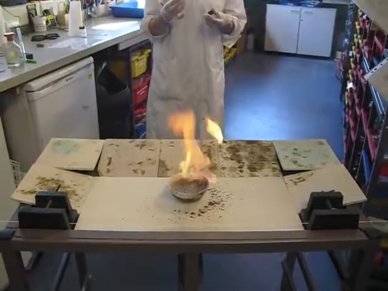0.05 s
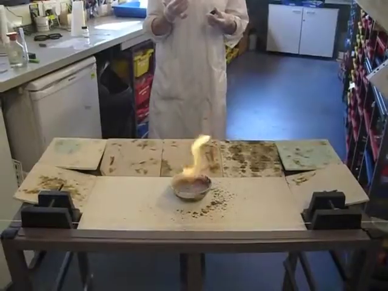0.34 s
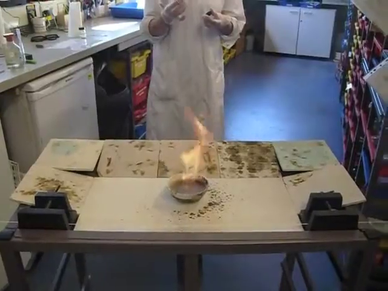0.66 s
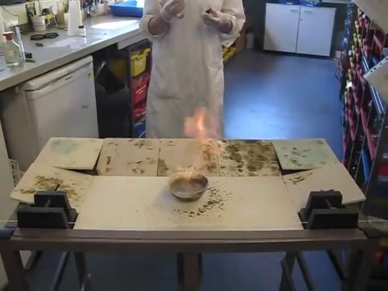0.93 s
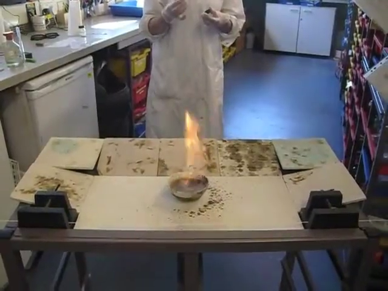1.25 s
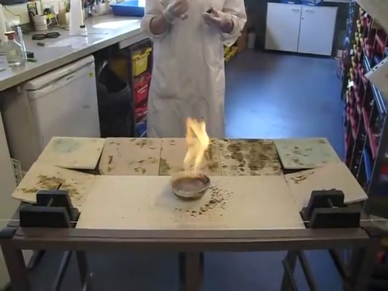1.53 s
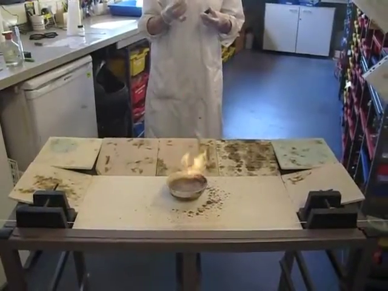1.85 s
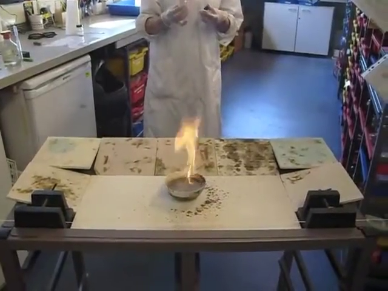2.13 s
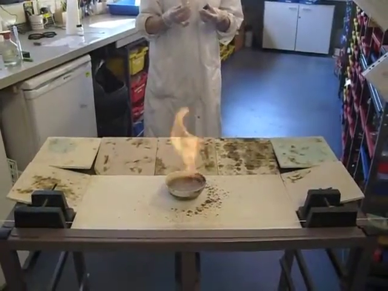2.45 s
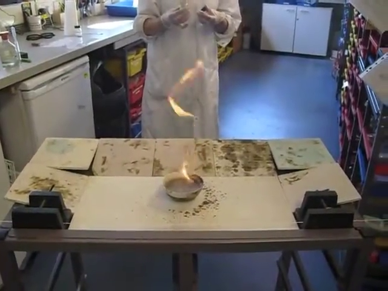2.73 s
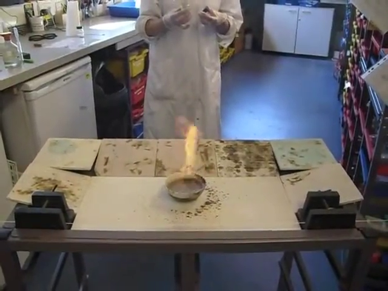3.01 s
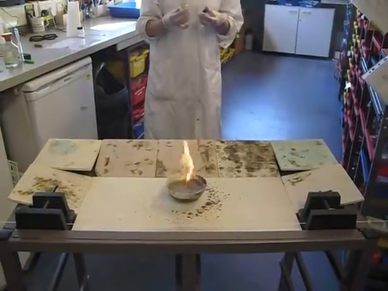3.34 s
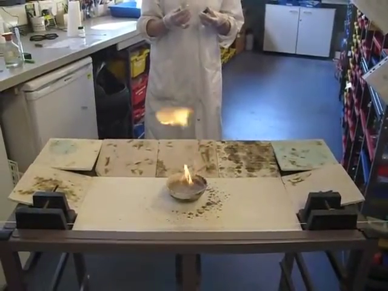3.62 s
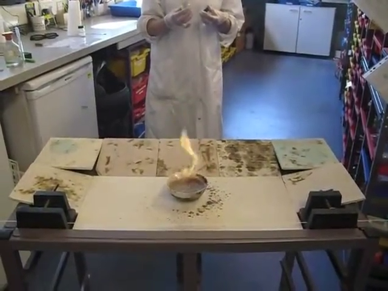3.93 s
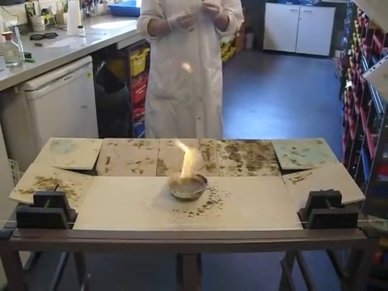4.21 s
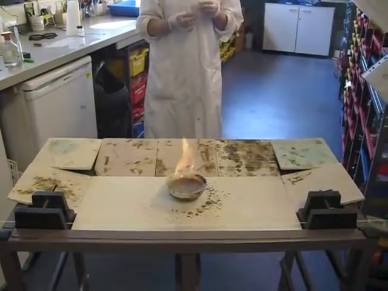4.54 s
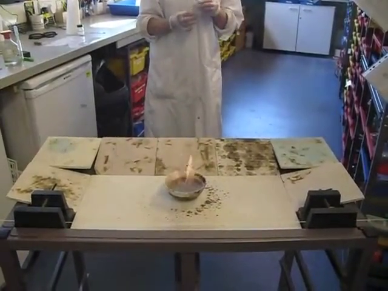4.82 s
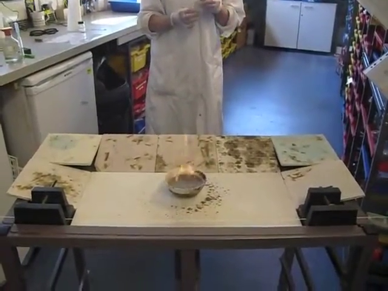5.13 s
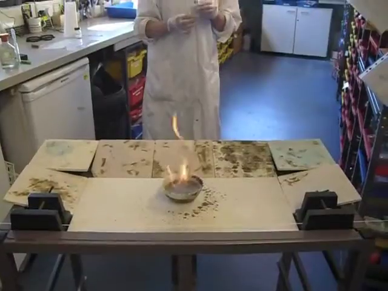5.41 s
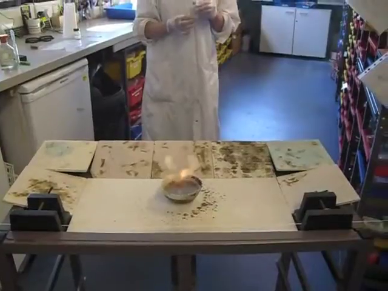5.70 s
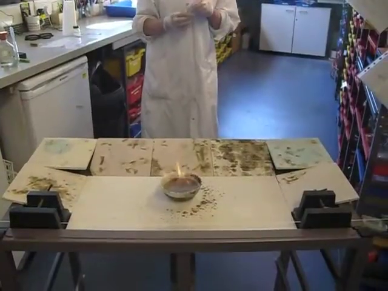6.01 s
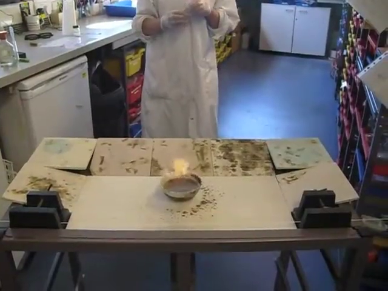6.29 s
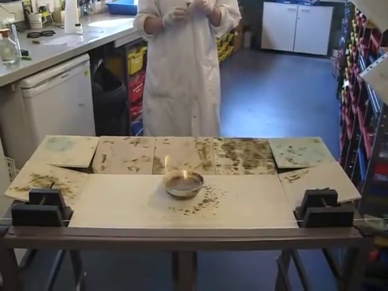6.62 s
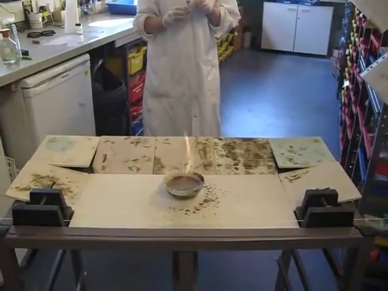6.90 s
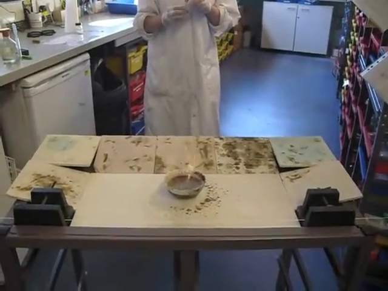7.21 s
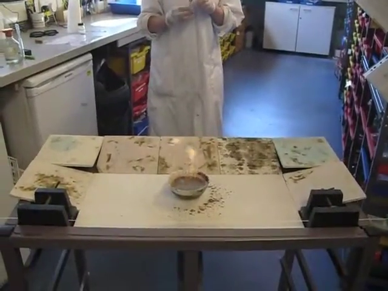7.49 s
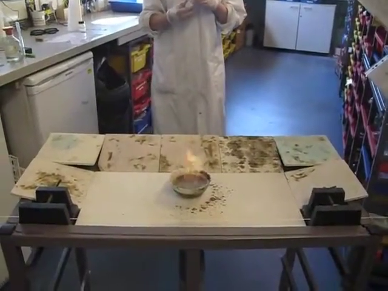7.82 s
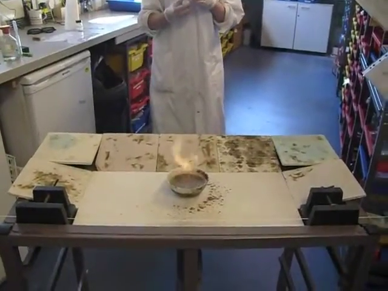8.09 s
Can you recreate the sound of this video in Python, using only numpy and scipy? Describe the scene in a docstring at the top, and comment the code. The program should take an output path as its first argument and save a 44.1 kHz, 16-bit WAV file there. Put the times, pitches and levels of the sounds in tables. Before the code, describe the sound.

A mixture burning in a small dish on a lab bench goes off in about ten sharp, uneven pops during the first three seconds, each with a brief spitting tail. It then settles into quiet sputtering and crackling, with one small late pop, short sizzles and a few tiny squeaks. The sound is centred, with a short room echo, over low ventilation rumble and faint microphone hiss.

```python
"""Burning mixture in a lab dish

For three seconds pockets of gas go off in sharp pops; after that the melt sputters, crackles and squeaks,
with one small late pop. Every burst is a pressure pulse, doubled by the bench top and answered by the
room. Ventilation rumbles underneath, and the camera adds hiss and a thin whine."""
import sys
import numpy as np
from scipy import signal
from scipy.fft import rfft, irfft, next_fast_len
from scipy.io import wavfile
from scipy.ndimage import uniform_filter1d, map_coordinates

SR = 44100
rng = np.random.default_rng(int(sys.argv[2]) if len(sys.argv) > 2 else 0)


def master(y):
    """Save y as 16-bit WAV."""
    cut = np.clip(np.atleast_2d(y).T, -1, 1)
    pcm = np.round(cut * 32767)  # scale
    wavfile.write(sys.argv[1], SR, pcm.astype(np.int16))


N = 359415

# Levels in the tables are relative; each layer sets its own gain.
# bed of ventilation and hiss: f/Hz, level/dB
AIR_COLOUR = [(13, -50), (22, 0.5), (150, -8), (250, -13.5), (430, -15.5), (600, -21.5), (1000, -22),
              (1500, -28), (2200, -32.5), (3100, -35), (4400, -36.5), (15000, -41)]
# low rumble of the duct: f/Hz, level/dB
DUCT_COLOUR = [(15, -2.0), (30, -6.5), (45, 5.0), (60, 7.5), (80, -1.5), (130, -20), (400, -54)]
# how hard the melt simmers, sinking until 3 s and swelling again by 5 s: t/s, level/dB
SIMMER_LEVEL = [(0, -57), (0.55, -58), (0.9, -61), (3.0, -67.5), (4.5, -59), (5.15, -51), (6.2, -51),
                (7.0, -56), (8.15, -55.5)]
# gas pockets going off: t/s, level/dB, thump/dB, upper body/dB, bite/dB, spray/dB, spray top/dB,
# cavity f/Hz; thump, upper body and bite count against their column's median
GAS_POCKETS = [(0.059, -4, -14.5, -32.5, -20.5, -26.5, 2.5, 3280),
               (0.602, -9, -16.5, -18.5, -21.5, -22, -5.5, 3070),
               (0.8738, 0.5, -14, -31, -30, -29.5, 0, 3230), (1.254, -2, -15, -23.5, -27, -30.5, 0.5, 2360),
               (1.512, -22, -15.5, -23.5, -11.5, -28, 3, 2480),
               (1.648, -4.5, -16, -24, -26.5, -30.5, -2, 2520),
               (1.963, -20.5, -1.5, -12, -4.5, -18, 3.5, 2520),
               (2.355, -10.5, -20, -26.5, -18, -24.5, -4.5, 2510),
               (2.629, -11, -11.5, -23.5, -18, -20, -3.5, 2620),
               (2.964, -6.5, -12.5, -32.5, -17, -21, -4.5, 2630),
               (5.831, -22.5, -21, -22, -17, -26.5, -6, 2550)]
# pressure pulse of a pop: f/Hz, level/dB
BLAST_COLOUR = [(40, -6.5), (110, -12), (200, 5.5), (380, 5.5), (700, 6), (1050, 6.5), (1400, -3.5),
                (2100, -11), (2900, -8), (4000, -32), (8000, -30.5), (15000, -52)]
# spray from a tearing film: f/Hz, level/dB
SNAP_COLOUR = [(800, -1), (2000, -4), (2900, 4), (4100, 1), (5600, 4.5), (8000, -3.5), (12000, -8.5),
               (15000, -13)]
# larger bubbles bursting in the melt: t/s, level/dB, brightness/dB
BUBBLES = [(0.297, -35.5, -29), (0.416, -28, -13), (0.441, -31, -27), (0.456, -26.5, -24),
           (0.512, -28.5, -16), (0.568, -32.5, -8.5), (1.164, -30.5, -21), (1.497, -30, -12),
           (1.911, -35.5, -17), (2.192, -32.5, -14), (2.32, -27.5, -17.5), (2.45, -30, -25),
           (3.301, -32, -13), (3.367, -29, -27), (3.381, -35, -29), (3.408, -35, -38), (3.588, -39, -17),
           (3.606, -29.5, -23), (3.663, -34, -21), (3.753, -34, -44), (3.822, -35.5, -28),
           (4.029, -34.5, -20), (4.11, -28, -25.5), (4.31, -32.5, -37), (4.35, -36.5, -9),
           (4.582, -38.5, -24), (4.739, -36.5, -24), (4.824, -37.5, -13), (4.897, -33.5, -12.5),
           (4.992, -36, -24), (5.045, -35.5, -11), (5.105, -32.5, -11), (5.225, -32, -17),
           (5.296, -31.5, -13), (5.318, -36, -17), (5.45, -38.5, -18), (5.518, -30.5, -24),
           (5.645, -33.5, -22), (5.666, -32, -11), (5.756, -38, -18), (5.982, -36, -20), (6.01, -29.5, -18),
           (6.086, -30, -23), (6.221, -32.5, -12), (6.325, -32.5, -20), (6.493, -37, -13),
           (6.531, -36, -33), (6.662, -35, -12), (6.735, -30.5, -19), (6.818, -36, -15), (6.942, -38, -33),
           (7.172, -29.5, -17), (7.502, -34.5, -11), (7.651, -35, -16), (7.675, -39.5, -23),
           (7.838, -33.5, -30), (7.98, -38.5, -12), (8.01, -37, -11)]
# pressure pulse of a bubble: f/Hz, level/dB
BUBBLE_COLOUR = [(60, -34.5), (200, 3.5), (400, 3.5), (750, 6), (1100, 5.5), (1500, -5), (2100, -10.5),
                 (2800, -9.5), (3900, -23), (6000, -28.5), (9000, -45), (15000, -44)]
# strongest jets of gas leaving the melt: t/s, level/dB
JETS = [(.416, -66), (.575, -55), (5.835, -48.5), (6.06, -53), (7.122, -53.5), (7.465, -57)]
# sizzle of a jet: f/Hz, level/dB
JET_COLOUR = [(1000, -7), (2800, -5), (4300, -2.5), (6300, -5.5), (9000, -14.5), (15000, -13)]
# gas squeaking through the crust: t/s, f/Hz, level/dB
PINHOLES = [(0.415, 3260, -55), (1.515, 3280, -48.5), (6.591, 804, -55), (6.763, 3200, -63),
            (7.12, 755, -50.5), (7.12, 3110, -66), (7.315, 3250, -66)]
# ring of bench and dish: f/Hz, width/Hz, level/dB
BENCH_MODES = [(270, 160, -0.5), (342, 7.6, 0.5), (442, 28, -4.5), (720.2, 28, 11), (740, 28, -5),
               (980, 6.7, -21), (994, 62, 2), (1030, 6.5, 2), (1360, 8.8, -9.5), (2516, 86, 12.5),
               (3268, 71, 8.5)]
# early reflections off boards, coat and cupboards: delay/ms, gain
REFLECTIONS = [(3.5, 0.1), (6.7, 0.056), (9.3, 0.3), (12.0, 0.043), (15.8, 0.24), (22.0, 0.079)]
# decay of the room's tail: f/Hz, t60/s
TAIL_T60 = [(150, 0.45), (400, 0.29), (1000, 0.23), (3000, 0.26), (6000, 0.29), (14000, 0.24)]
# tone of the room's tail: f/Hz, level/dB
TAIL_COLOUR = [(100, -14.5), (280, -3), (380, 4), (590, -6), (700, 0.5), (1000, 0), (1500, 5.5),
               (2100, 4.5), (3000, 5), (5000, 1.5), (14000, 5)]
# side signal, the diffuse sound that differs between two close microphone capsules: f/Hz, level/dB
SIDE_COLOUR = [(60, -39), (500, -46.5), (1000, -43.5), (2000, -33.5), (4000, -32), (14000, -25)]


def amp(db):
    """Decibels to gain."""
    return 10 ** (np.asarray(db) / 20)


def unit(x):
    """Scale to rms 1."""
    return x / np.sqrt(np.mean(x ** 2) + 1e-20)


def along(points, hz):
    """Read (f/Hz, value) points on a log frequency axis."""
    f, values = np.transpose(points)
    return np.interp(np.log(hz + 1), np.log(f + 1), values)


def wobble(rate):
    """A smooth random curve, rate knots a second."""
    return map_coordinates(rng.standard_normal(int(N * rate / SR) + 4), [np.arange(N) * rate / SR])


def filtered(x, response):
    """Pass x through a complex frequency response."""
    size = next_fast_len(N + SR)
    return irfft(rfft(x, size) * response(np.fft.rfftfreq(size, 1 / SR)), size)[..., :N]


def noise(colour):
    """Coloured noise of rms 1."""
    return unit(filtered(rng.standard_normal(N), lambda hz: amp(along(colour, hz))))


def pulse(colour, tilt=((1, 0),), size=2048):
    """A minimum-phase pressure pulse of the given colour, of peak 1 before the tilt EQ."""
    hz = np.fft.rfftfreq(size, 1 / SR)
    fold = np.r_[1, np.full(size // 2 - 1, 2), 1, np.zeros(size // 2 - 1)]
    causal = lambda db: irfft(np.exp(rfft(irfft(np.log(amp(db))) * fold)))
    plain_db = along(colour, hz)
    return causal(plain_db + along(tilt, hz)) / np.abs(causal(plain_db)).max()


def strikes(times, gains):
    """Impulses of the given sizes at the given times."""
    return np.bincount(np.round(np.clip(times, 0, None) * SR).astype(int), gains, N)[:N]


def envelope(triggers, rise_s, t60):
    """Every trigger starts a quick attack and an exponential decay."""
    t = np.arange(SR // 2) / SR
    shape = (1 - np.exp(-t / rise_s)) * amp(-60 * t / t60)
    return signal.fftconvolve(triggers, shape)[:N]


def room_tone(air_db=-50.5, rumble_db=-55, swell_db=1.0, whine_db=-69, whine_hz=15734):
    """Ventilation noise with a gently swelling rumble, plus the camera's hiss and whine."""
    air = amp(air_db) * noise(AIR_COLOUR)
    rumble = noise(DUCT_COLOUR) * amp(rumble_db + swell_db * wobble(rate=1.65))
    whine = amp(whine_db) * np.sqrt(2) * np.sin(2 * np.pi * whine_hz * np.arange(N) / SR)
    return air + rumble + whine


def simmer(gain_db=-8, spread_db=5, bubbles_per_colour=170, flurry_db=-24.5):
    """Tiny bubbles, dull to bright, burst at random; each larger bubble shakes loose a flurry of them."""
    patter = np.zeros(N)
    for bright_db in (-6, 0, 5):
        times = rng.random(bubbles_per_colour) * N / SR
        sizes = amp(spread_db * np.clip(rng.standard_normal(bubbles_per_colour), -2, 2))
        burst = pulse(BUBBLE_COLOUR, tilt=[(300, -bright_db), (1000, 0.014), (2400, bright_db)])
        patter += signal.fftconvolve(strikes(times, sizes), burst)[:N]
    bubble_s, bubble_db, _ = np.transpose(BUBBLES)
    flurries = envelope(strikes(bubble_s, amp(bubble_db + flurry_db)), rise_s=0.02, t60=0.29)
    bed_db = np.interp(np.arange(N) / SR, *np.transpose(SIMMER_LEVEL))
    return np.hypot(amp(bed_db + gain_db), flurries) * unit(patter)


def pops(spray_gain_db=7, snap_t60=0.011, spit_db=-25, spit_t60=0.18, cavity_width_hz=450):
    """A gas pocket goes off; its film tears in a snap of spray that rings the emptied cavity."""
    out = np.zeros(N + SR)
    t = np.arange(SR // 8) / SR
    snap_and_spit = amp(-60 * t / snap_t60) + amp(spit_db - 60 * t / spit_t60)
    usual_colour = np.median(GAS_POCKETS, axis=0)[2:-3]
    snap_norm = np.linalg.norm(pulse(SNAP_COLOUR))
    for s, db, *colour, spray_db, top_db, cavity_hz in GAS_POCKETS:
        thump, upper_body, bite = colour - usual_colour
        tilt = [(400, thump), (800, 0), (1300, 0.006), (1850, upper_body), (2600, bite)]
        blast = pulse(BLAST_COLOUR, tilt)
        tear = snap_and_spit * rng.uniform(-1.28, 1, len(t))
        snap = pulse(SNAP_COLOUR, tilt=[(5500, 0), (8000, top_db)]) / snap_norm
        spray = signal.fftconvolve(tear, snap)
        cavity = signal.lfilter(*signal.iirpeak(cavity_hz, cavity_hz / cavity_width_hz, SR), spray)
        out[round(s * SR):][:len(blast)] += amp(db) * blast
        out[round(s * SR):][:len(spray)] += amp(db + spray_db + spray_gain_db) * (spray + cavity)
    return out[:N]


def crackles(gain_db=-2.5, bass_spread_db=2.7, bright_share=0.41):
    """Larger bubbles burst one by one, each with its own weight and brightness."""
    out = np.zeros(N + SR)
    usual_bright_db = np.median(BUBBLES, axis=0)[2]
    for s, db, bright_db in BUBBLES:
        bass_db = rng.normal(0, bass_spread_db)
        treble_db = bright_share * (bright_db - usual_bright_db)
        burst = pulse(BUBBLE_COLOUR, tilt=[(300, bass_db), (1100, 0), (2400, treble_db)])
        out[round(s * SR):][:len(burst)] += amp(db + gain_db) * burst
    return out[:N]


def sizzles(jet_gain_db=-5, vent_db=-18.5):
    """Gas jets open fast and fade as their pockets empty; each larger bubble vents a weak one too."""
    jet_s, jet_db = np.transpose(JETS)
    bubble_s, bubble_db, bright_db = np.transpose(BUBBLES)
    jets = strikes(jet_s, amp(jet_db + jet_gain_db))
    vents = strikes(bubble_s, amp(bubble_db + bright_db + vent_db))
    return envelope(jets + vents, rise_s=0.0014, t60=0.1) * noise(JET_COLOUR)


def squeaks(gain_db=-2, length_s=0.026, width_hz=260):
    """Gas squeezes through pinholes in the crust, each a short swell of unsteady whistle."""
    out = np.zeros(N + SR)
    t = np.arange(SR // 8) / SR
    swell = np.sin(np.pi * np.minimum(t / length_s, 1))
    for s, hz, db in PINHOLES:
        phase_drift = np.cumsum(rng.standard_normal(len(t))) * np.sqrt(2 * np.pi * width_hz / SR)
        whistle = np.sin(2 * np.pi * hz * t + phase_drift)
        out[round(s * SR):][:len(t)] += amp(db + gain_db) * swell * whistle
    return out[:N]


def bench(x, bounce_ms=0.95, dull_hz=2600, ring_db=-3):
    """The direct hit, its duller bounce off the bench top, early reflections and a short ring."""
    def paths(hz):
        delay = lambda ms: np.exp(-2j * np.pi * hz * ms / 1000)
        bounce = delay(bounce_ms) / (1 + (hz / dull_hz) ** 4)
        echoes = sum(gain * delay(ms) for ms, gain in REFLECTIONS)
        ring = sum(amp(db + ring_db) * 1j * hz * width / (mode_hz ** 2 - hz ** 2 + 1j * hz * width)
                   for mode_hz, width, db in BENCH_MODES)
        return 1 + bounce + echoes + ring
    return filtered(x, paths)


def room(x, predelay_s=0.0014, build_s=0.0011):
    """A diffuse tail builds up after a short gap; each frequency dies at its own speed."""
    hz, t, bands = signal.stft(rng.standard_normal(SR // 2), SR, nperseg=256)
    t60 = along(TAIL_T60, hz)[:, None]
    tail = signal.istft(bands * amp(-60 * t / t60), SR, nperseg=256)[1]
    age_s = np.maximum(np.arange(len(tail)) / SR - predelay_s, 0)
    tail *= 1 - np.exp(-age_s / build_s)
    # the many paths share the energy evenly over each stretch of the spectrum
    spectrum = rfft(tail)
    local_power = np.abs(uniform_filter1d(np.abs(spectrum) ** 2, size=120))
    tail = irfft(spectrum / np.sqrt(local_power + 1e-12))
    wet = signal.fftconvolve(x, tail[:SR * 2 // 5])[:N]
    return filtered(wet, lambda hz: amp(along(TAIL_COLOUR, hz)))


def scene(side_tone_db=-8):
    """The dish sits dead centre; only reverb and room tone give the stereo width."""
    fire = pops() + crackles() + simmer() + sizzles() + squeaks()
    mid = bench(fire) + room(fire) + room_tone()
    diffuse = room(fire) + amp(side_tone_db) * room_tone()
    side = filtered(diffuse, lambda hz: amp(along(SIDE_COLOUR, hz)))
    return np.array([mid + side, mid - side])


def record(dry, ceiling=0.71, hardness=8, top_hz=16250):
    """The loudest pops overload the input and soft-clip; a brick-wall low-pass cuts the very top."""
    clipped = dry / (1 + np.abs(dry / ceiling) ** hardness) ** (1 / hardness)
    return filtered(clipped, lambda hz: hz < top_hz)


dry = scene()
out = record(dry)
master(out)
```